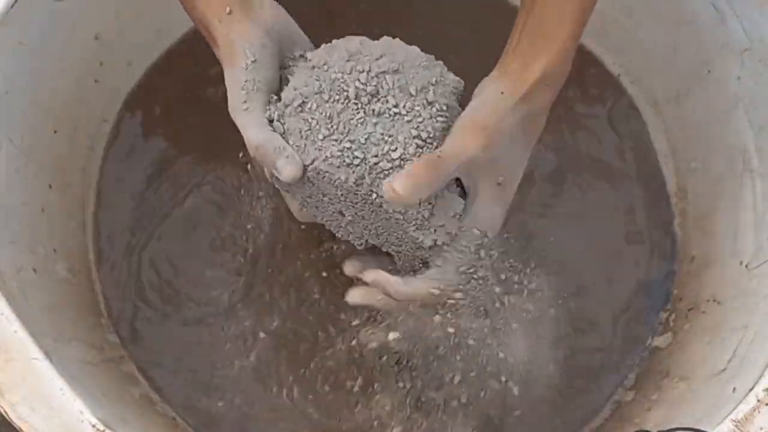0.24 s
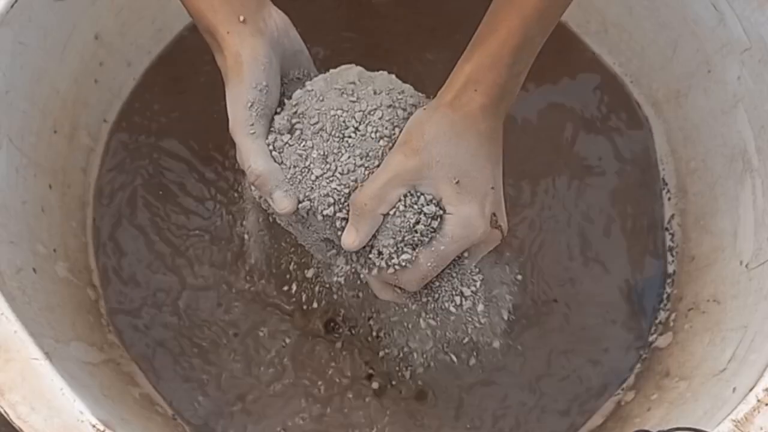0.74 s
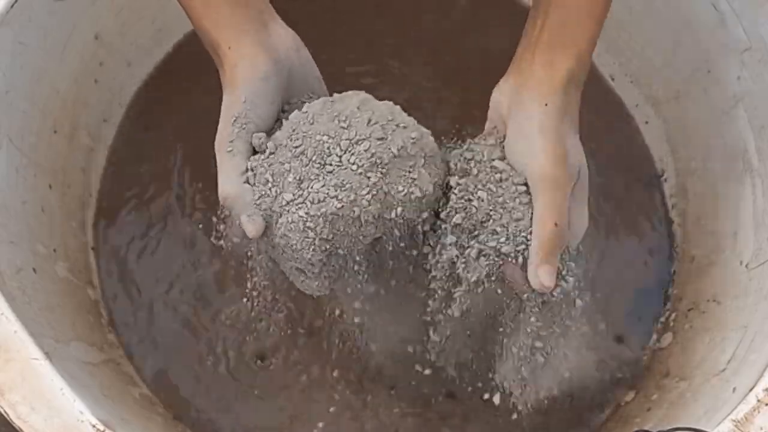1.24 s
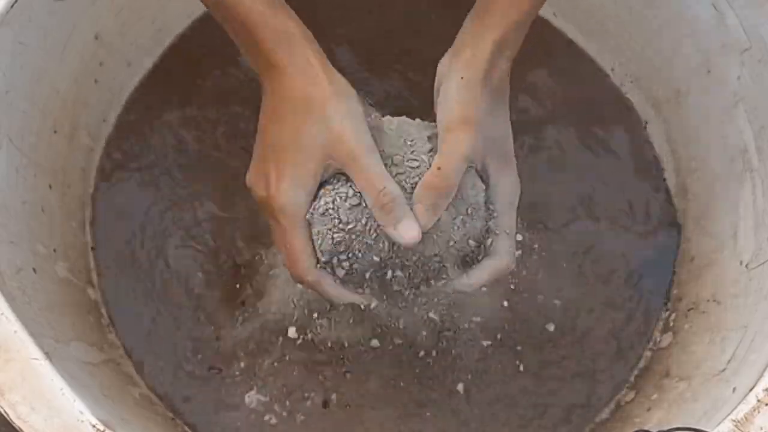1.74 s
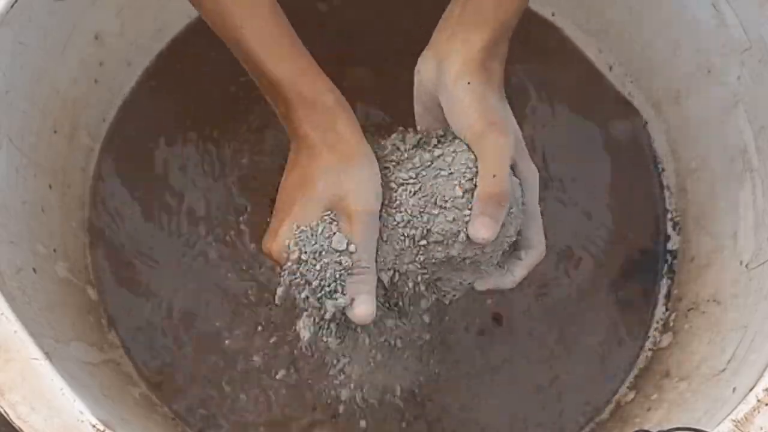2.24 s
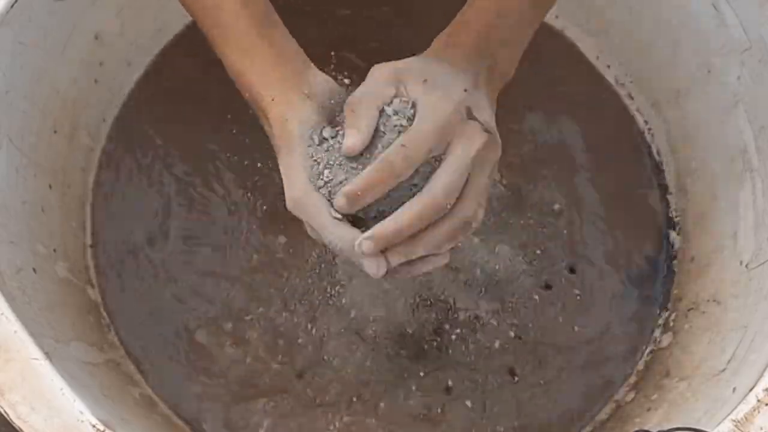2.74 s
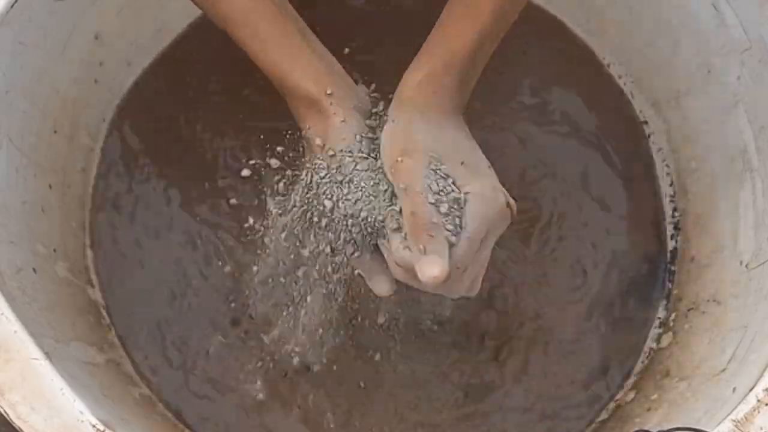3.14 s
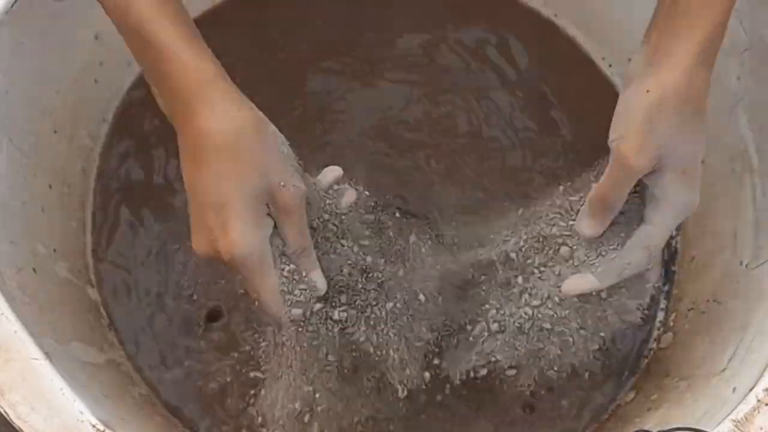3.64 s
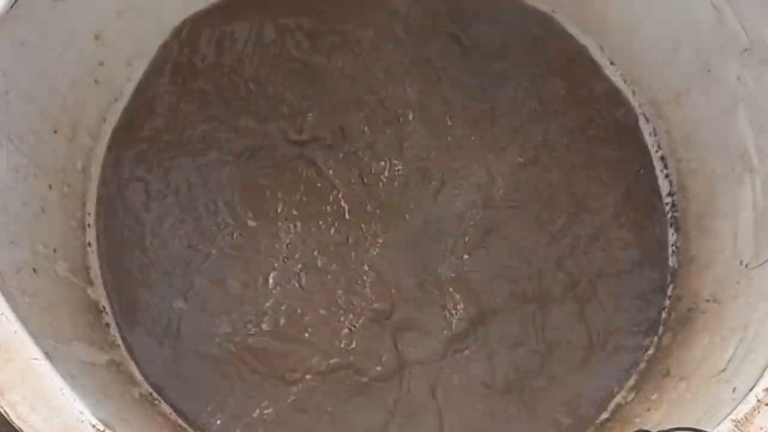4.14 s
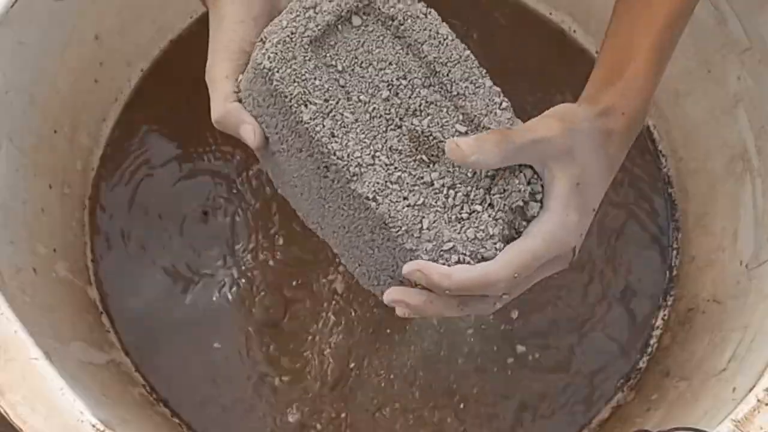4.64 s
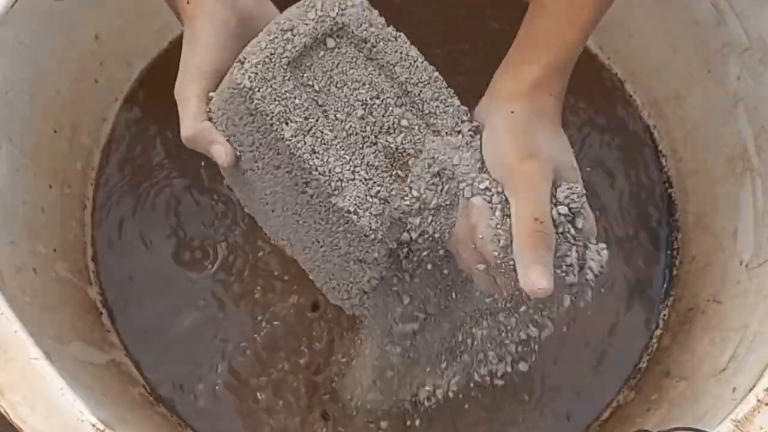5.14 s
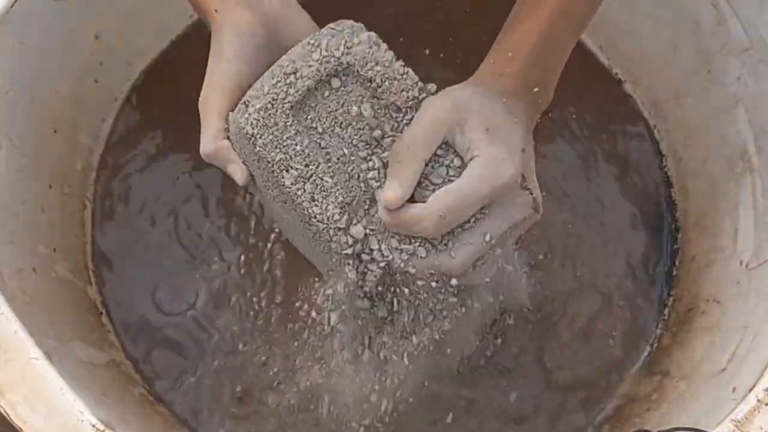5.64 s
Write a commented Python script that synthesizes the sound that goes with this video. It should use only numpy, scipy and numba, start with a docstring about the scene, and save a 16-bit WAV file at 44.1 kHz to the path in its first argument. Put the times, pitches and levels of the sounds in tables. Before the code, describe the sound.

Hands crumble a dry, gritty block over a basin of water, close to the microphone. Each squeeze crackles with sharp little clicks and sends grains fizzing into the water, while lumps land with small plops. Handfuls follow quickly, pause briefly after about four seconds, then resume. The basin adds a short hollow ring over a faint outdoor rumble.

```python
"""A gritty block crumbles between hands over a round basin of water, close to a small microphone.
Each squeeze sends down a handful: dry grit crackles between the fingers, falling grains trap
small bubbles and lumps plop in. The basin throws everything back with a short hollow ring,
over a faint outdoor rumble."""
import sys
import numpy as np
from scipy import signal
from scipy.fft import rfft, irfft, next_fast_len
from scipy.io import wavfile
from scipy.ndimage import uniform_filter1d
from numba import njit

SR = 44100
rng = np.random.default_rng(int(sys.argv[2]) if len(sys.argv) > 2 else 0)


def master(y):
    """Save y as 16-bit WAV."""
    cut = np.clip(np.atleast_2d(y).T, -1, 1)
    pcm = np.round(cut * 32767)  # scale
    wavfile.write(sys.argv[1], SR, pcm.astype(np.int16))


N = 259749


def gain_of(db):
    return 10 ** (np.asarray(db) / 20)


def unit_rms(x):
    return x / np.sqrt(np.mean(x ** 2) + 1e-20)


def db_at(spectrum, hz):
    freq_hz, level_db = np.transpose(spectrum)
    return np.interp(np.log(hz + 1), np.log(freq_hz + 1), level_db)


def add(mix, start_s, sound):
    part = mix[round(start_s * SR):][:len(sound)]
    part += sound[:len(part)]


def coloured(x, spectrum):
    size = next_fast_len(N)
    response = gain_of(db_at(spectrum, np.fft.rfftfreq(size, 1 / SR)))
    return irfft(rfft(x, size) * response, size)[:N]


@njit
def ring(onset, gain, hz, t60_s, glide, attack_cycles):
    """Sum of decaying sines with soft attacks; pitch rises by 2 * glide * hz per t60."""
    out = np.zeros(N)
    for k in range(len(onset)):
        step = np.exp((2j * np.pi * hz[k] - np.log(1000) / t60_s[k]) / SR)
        chirp = np.exp(4j * np.pi * glide * hz[k] / t60_s[k] / SR ** 2)
        mute_decay = np.exp(-hz[k] / SR / attack_cycles)
        phasor, mute = gain[k] + 0j, 1.
        for n in range(onset[k], min(onset[k] + int(t60_s[k] * SR * .7), N)):
            out[n] += phasor.imag * (1 - mute)
            phasor *= step
            step *= chirp
            mute *= mute_decay
    return out


def grains(spectrum, count, spread_db, clump_db, clump_s, t60_cycles, glide, attack_cycles):
    """Many pings of random pitch, a few loud; grains fall in clumps, so levels swell together."""
    swell = unit_rms(uniform_filter1d(rng.standard_normal(N), max(int(clump_s * SR), 2)))
    when, pitch, chance, life, sign = rng.random((count, 5)).T
    onset = (when * N).astype(int)
    low_hz, high_hz = spectrum[0][0], spectrum[-1][0]
    hz = low_hz * (high_hz / low_hz) ** pitch
    excess_db = spread_db * np.minimum(-np.log(chance + 1e-9), 5.5)
    gain = np.sign(sign - .5) * gain_of(db_at(spectrum, hz) + excess_db + clump_db * swell[onset])
    t60_s = t60_cycles * (.5 + life) / hz
    return unit_rms(ring(onset, gain, hz, t60_s, glide, attack_cycles))


def scattered(flow_db, over_db, low_hz, high_hz, spread_db, count):
    """Random rows of start_s, level_db, pitch_hz; levels follow the flow."""
    when, size, pitch = rng.random((count, 3)).T
    level_db = flow_db[(when * N).astype(int)] + over_db + spread_db * (size - .5)
    return np.column_stack([when * N / SR, level_db, low_hz * (high_hz / low_hz) ** pitch])


# One handful per squeeze: start_s, rise_s, hold_s, water_db, dry_db, coarse_db
HANDFULS = [(-.03, 0.034, 0.15, -25, -27.5, -38.5), (0.129, 0.041, .36, -25, -27.5, -34.5),
            (0.529, .04, 0.082, -37.5, -37.5, -64), (0.629, 0.069, 0.099, -35, -36, -54.5),
            (0.843, 0.035, 0.1, -28, -34.5, -38), (.99, .04, 0.2, -34.5, -35, -54),
            (1.169, 0.0092, 0.28, -25, -27, -31.5), (1.429, 0.072, 0.038, -23, -30, -54),
            (1.53, 0.077, 0.26, -30, -36.5, -47.5), (1.824, 0.049, .14, -36, -34, -49.5),
            (2.073, 0.086, 0.064, -24, -27, -39), (2.2, 0.088, 0.14, -28.5, -29.5, -48.5),
            (2.353, 0.086, 0.15, -25.5, -28.5, -39.5), (2.497, 0.087, .3, -27, -31, -45.5),
            (2.846, .07, 0.13, -33.5, -39, -49.5), (3.002, 0.081, 0.054, -31, -32, -51),
            (3.13, 0.071, .21, -31.5, -32.5, -54), (3.376, 0.056, 0.4, -26, -26, -38),
            (3.653, 0.058, 0.22, -23, -28, -34), (3.912, 0.083, 0.043, -24.5, -33, -42),
            (4.116, 0.049, 0.069, -59, -54, -66), (4.528, 0.019, 0.041, -31, -35.5, -42),
            (4.6, 0.087, 0.035, -32, -38, -48), (4.751, 0.064, 0.045, -31, -30, -47.5),
            (4.879, 0.067, 0.063, -31.5, -32.5, -47), (5.001, 0.036, 0.063, -29.5, -28, -39),
            (5.093, 0.079, 0.13, -32.5, -31.5, -42), (5.285, 0.049, 0.16, -25.5, -27.5, -34),
            (5.431, 0.089, 0.14, -24.5, -25, -37), (5.64, 0.046, 0.2, -33, -29.5, -43.5)]


def handful_flow(layer, floor_db, sag_db_per_s, stop_db_per_s):
    """One layer's level in dB: each handful swells, thins while held, then runs out to a trickle."""
    column = ("water", "dry", "coarse").index(layer)
    t = np.arange(0, N, 32) / SR
    power = gain_of(2 * floor_db)
    for start_s, rise_s, hold_s, *levels_db in HANDFULS:
        since_peak_s = t - start_s - rise_s
        swell = np.clip(1 + since_peak_s / rise_s, 0, 1) ** 4
        sag_db = sag_db_per_s * np.maximum(since_peak_s, 0)
        stop_db = stop_db_per_s * np.maximum(since_peak_s - hold_s, 0)
        power = power + swell * gain_of(2 * (levels_db[column] - sag_db - stop_db))
    return np.interp(np.arange(N) / SR, t, 10 * np.log10(power))


# Small bubbles: pitch_hz, level_db
FIZZ_SPECTRUM = [(500, -21), (900, -2), (1400, 3.5), (2200, 5.5), (3500, 5.5), (5500, 2.5), (8000, 2)]
# Dry grains: pitch_hz, level_db
GRIT_SPECTRUM = [(1500, -8), (3000, 1), (5000, 5), (7500, 7), (11000, 8), (15500, 4)]
# Large bubbles: pitch_hz, level_db
GURGLE_SPECTRUM = [(150, -14.5), (230, -2), (350, 3), (650, 0.5)]


def pour(water_db, dry_db, coarse_db):
    """Grit crackles in the fingers and traps small bubbles in the water; lumps stir up large ones."""
    fizz = grains(FIZZ_SPECTRUM, count=20000, spread_db=2.5, clump_db=1.5, clump_s=.012,
                  t60_cycles=28.6, glide=.2, attack_cycles=.3)
    grit = grains(GRIT_SPECTRUM, count=100000, spread_db=3.5, clump_db=1.6, clump_s=.0072,
                  t60_cycles=7.8, glide=0., attack_cycles=.24)
    gurgle = grains(GURGLE_SPECTRUM, count=5000, spread_db=2., clump_db=2.9, clump_s=.027,
                    t60_cycles=10.2, glide=.059, attack_cycles=.21)
    gurgle_gain = np.sqrt(gain_of(2 * coarse_db) + churn_power())
    return gain_of(-1) * (gain_of(water_db) * fizz + gain_of(dry_db) * grit + gurgle_gain * gurgle)


# Air modes of the basin: pitch_hz, width_hz, level_db
BASIN_MODES = [(342, 91, -8), (550, 71, 0), (764, 54, -3.5), (1023, 47, -20), (1293, 28, -6.5)]


def basin(x, tail_db=-17., tail_t60_s=.06):
    """The air in the basin rings at its modes; the walls add a short diffuse tail."""
    t = np.arange(6000) / SR
    tail = rng.standard_normal(len(t)) * gain_of(-60 * t / tail_t60_s)
    response = gain_of(tail_db) * unit_rms(tail) / np.sqrt(len(t))
    response[0] = 1  # direct sound
    for pitch_hz, width_hz, level_db in BASIN_MODES:
        mode = np.exp(-np.pi * width_hz * t) * np.cos(2 * np.pi * pitch_hz * t)
        response += gain_of(level_db) * 2 * np.pi * width_hz / SR * mode
    return signal.oaconvolve(x, response)[:N]


# Background noise: freq_hz, relative_density_db
BACKGROUND_SPECTRUM = [(40, -21), (90, -1), (140, 3.5), (280, -15), (380, -26), (1300, -25), (2500, -69.5),
                       (8000, -31), (15000, -34)]


def background(rms_db=-45.5):
    """Distant outdoor rumble and microphone hiss."""
    return gain_of(rms_db) * unit_rms(coloured(rng.standard_normal(N), BACKGROUND_SPECTRUM))


# Loudest breaking grains: start_s, peak_db, pitch_hz, debris_t60_s
GRAIN_CRACKS = [(0.0988, -8, 5250, 0.004), (0.161, -4, 7120, 0.004), (0.2105, -8, 3890, 0.004),
                (0.4071, -7, 8640, 0.004), (0.4641, -2, 5420, 0.004), (0.4991, -6, 8930, 0.004),
                (0.515, -7, 5980, 0.009), (0.8143, -16, 9440, 0.004), (0.8849, -7, 5630, 0.004),
                (0.9186, -6, 5510, 0.004), (0.9467, -11, 5490, 0.004), (1.0133, -15, 6500, 0.004),
                (1.1786, -6, 6260, 0.004), (1.1873, -5, 5000, 0.004), (1.2311, -7, 5240, 0.004),
                (1.2611, -7, 11280, 0.004), (1.3732, -10, 7380, 0.004), (1.4656, -12, 11000, 0.004),
                (1.6015, -13, 6130, 0.004), (1.8402, -5, 7210, 0.004), (1.9284, -4, 4860, 0.014),
                (1.9561, -13, 5400, 0.004), (2.1682, -10, 3270, 0.004), (2.2845, -12, 11150, 0.004),
                (2.4271, -8, 7090, 0.004), (2.7979, -6, 7080, 0.009), (2.8593, -12, 5370, 0.004),
                (3.4141, -10, 7350, 0.004), (3.6008, -9, 6450, 0.004), (3.8295, -5, 4500, 0.004),
                (4.5349, -20, 6480, 0.004), (4.5504, -14, 3600, 0.004), (4.5685, -12, 7250, 0.004),
                (4.5768, -3, 6840, 0.004), (4.6374, -12, 5230, 0.004), (4.7, -17, 4500, 0.006),
                (4.725, -16, 5700, 0.009), (4.9714, -13, 9040, 0.004), (5.0784, -10, 6800, 0.004),
                (5.0878, -7, 10040, 0.004), (5.1892, -10, 5510, 0.004), (5.2922, -9, 5780, 0.004),
                (5.3211, -6, 10640, 0.004), (5.3433, -6, 5380, 0.004), (5.3505, -6, 9010, 0.004),
                (5.3987, -7, 3550, 0.004), (5.4102, -6, 2850, 0.004), (5.4692, -5, 6420, 0.004),
                (5.4912, -5, 5790, 0.004), (5.5271, -7, 7990, 0.004), (5.6549, -9, 9740, 0.004),
                (5.7764, -7, 7730, 0.004)]


def cracks(dry_db, echo_s=.0021, echo_db=-8.5, debris_db=-11, small_t60_s=.004):
    """A grain breaks with a sharp click and a rattle of debris; the water surface echoes it."""
    out, t = np.zeros(N), np.arange(800) / SR
    small = scattered(dry_db, over_db=15., low_hz=3460, high_hz=12500, spread_db=13., count=130)
    for start_s, peak_db, pitch_hz, t60_s in GRAIN_CRACKS + [(*row, small_t60_s) for row in small]:
        force = rng.standard_normal(len(t)) * gain_of(debris_db - 60 * t / t60_s)
        force[0] = 1  # the click
        span = 1.35 + .0025 / t60_s  # longer rattle, narrower band
        band = signal.butter(2, [pitch_hz / span, min(pitch_hz * span, SR * .45)], "band", fs=SR)
        burst = signal.lfilter(*band, force)
        add(out, start_s, gain_of(peak_db) * burst / abs(burst).max())
    return out + gain_of(echo_db) * np.roll(out, round(echo_s * SR))


# Lumps hitting the water: start_s, level_db, pitch_hz, t60_s, slap_relative_db; the row at 0.176 s is no lump
# of its own but a low 514 Hz ring under the first plop
LUMP_PLOPS = [(0.173, -8.5, 764, 0.053, 13), (0.176, -15, 514, 0.05, -12), (0.215, -8.5, 1030, 0.026, 2),
              (0.358, -18, 1265, 0.033, 2), (0.562, -20, 1250, 0.033, 6), (0.85, -24, 1480, 0.032, -4),
              (0.883, -26, 740, 0.04, 14), (1.117, -17.5, 2090, 0.029, -16), (1.187, -12, 786, 0.037, 7.5),
              (1.223, -10, 1720, 0.021, 3), (1.317, -12, 970, 0.026, 5.5), (1.838, -22, 850, 0.046, 5),
              (1.93, -19, 933, 0.051, 0), (2.159, -18, 545, 0.037, -13), (2.187, -7, 940, 0.013, 0),
              (2.217, -10, 972, 0.044, -16), (2.259, -19.5, 1000, 0.069, -6),
              (2.446, -10.5, 1013, 0.043, -5), (2.497, -10.5, 1030, 0.022, -1),
              (2.558, -22, 1250, 0.047, -2), (2.672, -19, 1580, 0.037, -7), (2.748, -23, 1240, 0.042, -12),
              (2.819, -17.5, 926, 0.038, -14), (3.097, -19, 1750, 0.034, 0), (3.17, -18, 1610, 0.031, -12),
              (3.187, -23, 2030, 0.051, 0), (3.751, -2, 955, 0.025, -21), (3.822, -14.5, 1025, 0.048, 7),
              (3.888, -14, 804, 0.038, 0), (3.94, -15, 1260, 0.036, 4), (3.988, -17, 1280, 0.038, -1),
              (4.024, -17, 1270, 0.033, 10.5), (4.059, -21, 1566, 0.042, -4),
              (4.114, -25.5, 1022, 0.065, -13), (4.55, -16.5, 855, 0.024, 7),
              (4.636, -18.5, 1010, 0.024, 3), (4.673, -21, 1640, 0.034, -6), (4.693, -22, 900, 0.033, -1),
              (4.709, -18, 734, 0.034, 2), (4.748, -21, 1630, 0.027, -5), (5.321, -13, 1460, 0.022, -2),
              (5.35, -6, 796, 0.025, 7.5), (5.416, -10, 830, 0.021, 7), (5.459, -15, 830, 0.042, -5),
              (5.509, -12, 890, 0.021, 5), (5.529, -12.5, 573, 0.024, -9), (5.562, -17, 1237, 0.045, -12)]


def plops(water_db, slap_hz=1145., slap_t60_s=.0052, slap_delay_s=.0009,
          small_t60_s=.02, small_slap_db=-3.):
    """Each lump slaps the surface and leaves one main bubble and three fainter ones."""
    small = scattered(water_db, over_db=6.5, low_hz=920, high_hz=1856, spread_db=10., count=60)
    rows = LUMP_PLOPS + [(*row, small_t60_s, small_slap_db) for row in small]
    start_s, level_db, pitch_hz, t60_s, slap_relative_db = np.transpose(rows)
    onset, each = (start_s * SR).astype(int), np.ones(len(rows))
    slaps = ring(onset + round(slap_delay_s * SR), -gain_of(level_db + slap_relative_db),
                 slap_hz * each, slap_t60_s * each, glide=0., attack_cycles=.33)
    bubbles = ring(onset, gain_of(level_db), pitch_hz, t60_s, glide=.032, attack_cycles=1.)
    for lag, detune in rng.random((len(rows), 3, 2)).transpose(1, 2, 0):
        late_onset = onset + (lag * .025 * SR).astype(int)
        bubbles += ring(late_onset, gain_of(level_db - 10), pitch_hz * (.7 + 1.2 * detune),
                        .59 * t60_s, glide=.037, attack_cycles=.45)
    return slaps + bubbles


def churn_power(over_slap_db=-20.5, t60_s=.057):
    """Power envelope of the large bubbles briefly stirred up by each listed slap."""
    kicks = np.zeros(N)
    for start_s, level_db, _, _, slap_relative_db in LUMP_PLOPS:
        add(kicks, start_s, gain_of([2 * (level_db + slap_relative_db + over_slap_db)]))
    decay = gain_of(-2 * 60 / t60_s / SR)
    return signal.lfilter([1], [1, -decay], kicks)


def scene():
    water_db = handful_flow("water", floor_db=-65.5, sag_db_per_s=9.5, stop_db_per_s=207)
    dry_db = handful_flow("dry", floor_db=-57.5, sag_db_per_s=12.5, stop_db_per_s=191)
    coarse_db = handful_flow("coarse", floor_db=-65, sag_db_per_s=21, stop_db_per_s=207)
    crumbling = pour(water_db, dry_db, coarse_db) + plops(water_db) + cracks(dry_db)
    return (basin(crumbling) + background())[None]


# Small microphone: freq_hz, gain_db
MICROPHONE_RESPONSE = [(20, -33), (60, -1), (100, -3), (7000, 0), (9700, -5), (13200, 0.5), (15000, 4),
                       (15900, -27)]


def record(dry):
    """Microphone colour, then the recorder's band limit."""
    heard = coloured(dry[0], MICROPHONE_RESPONSE)
    cutoff_hz = 15900
    lowpass = signal.firwin(511, cutoff_hz, window=("kaiser", 9), fs=SR)
    return signal.oaconvolve(heard, lowpass, "same")[None]


dry = scene()
out = record(dry)
master(out)
```